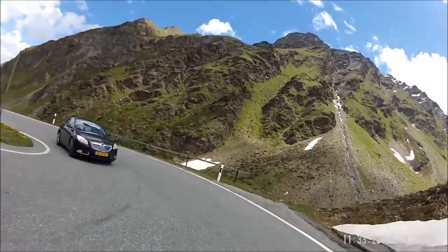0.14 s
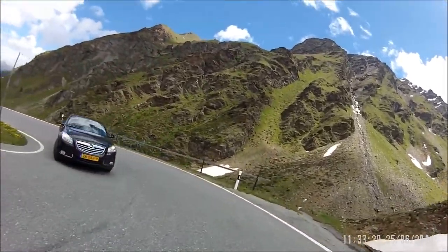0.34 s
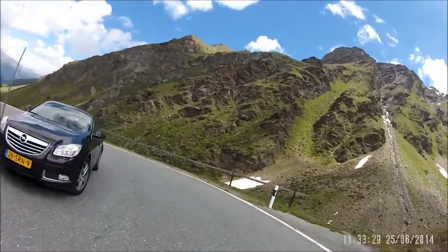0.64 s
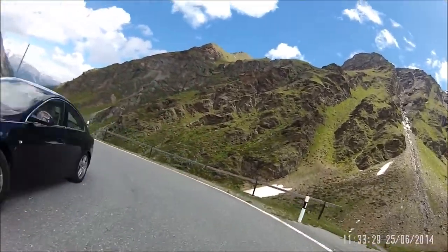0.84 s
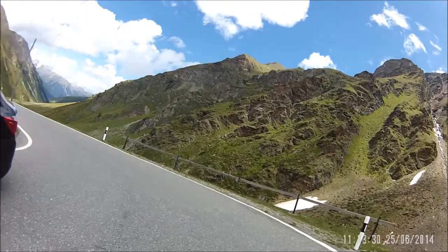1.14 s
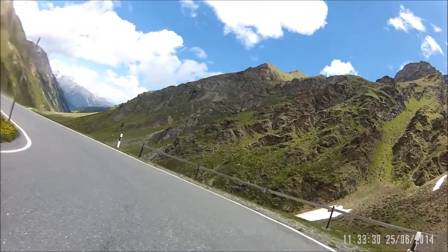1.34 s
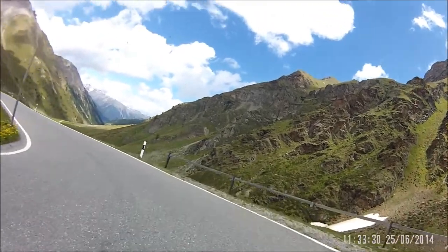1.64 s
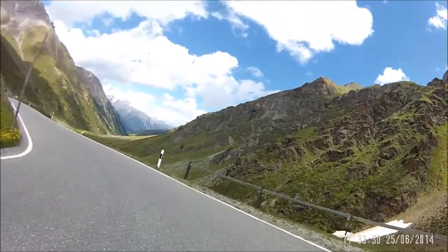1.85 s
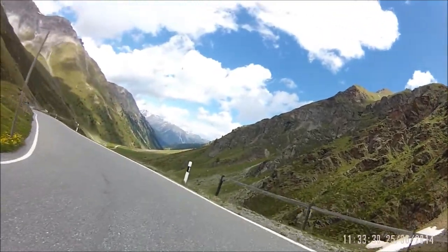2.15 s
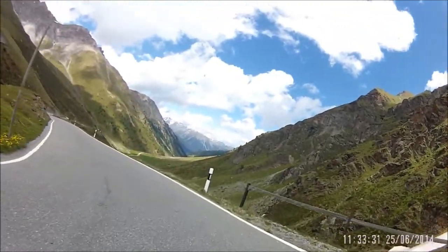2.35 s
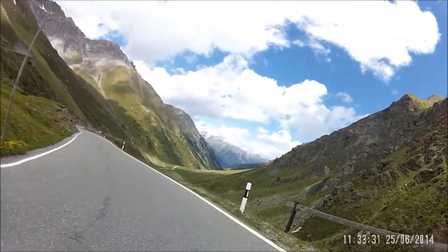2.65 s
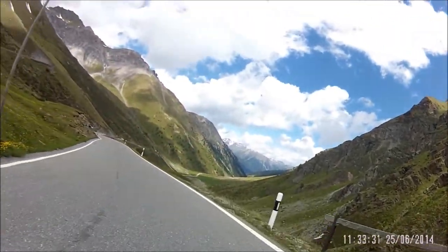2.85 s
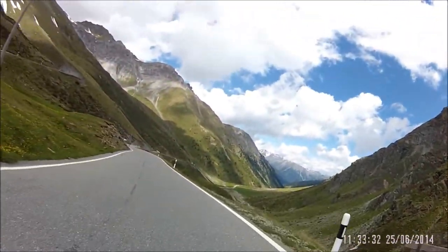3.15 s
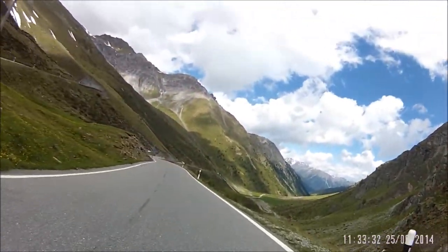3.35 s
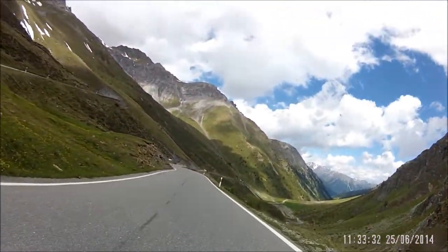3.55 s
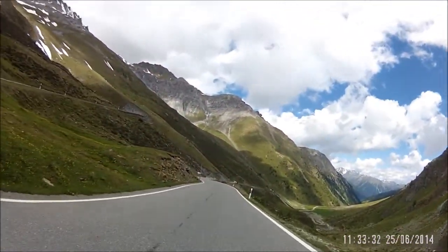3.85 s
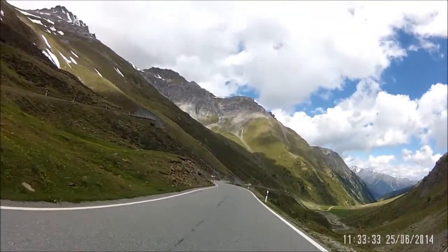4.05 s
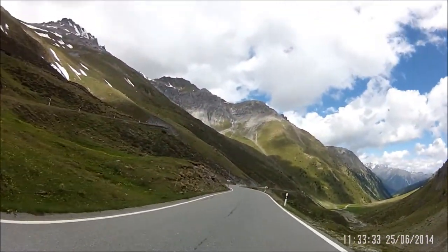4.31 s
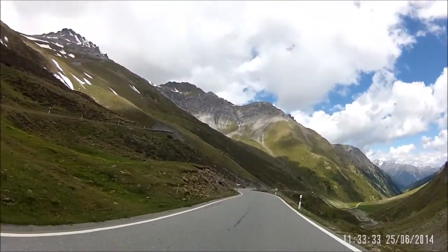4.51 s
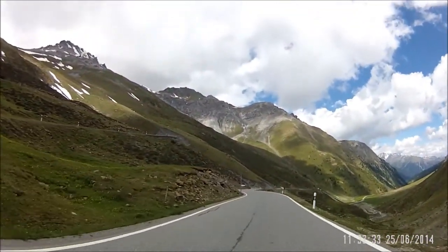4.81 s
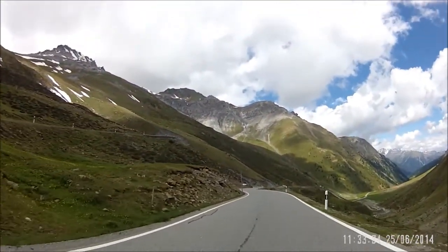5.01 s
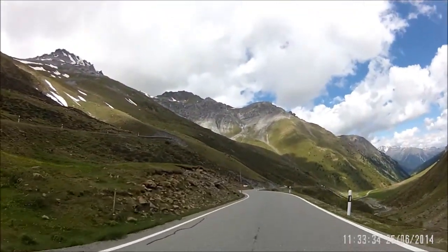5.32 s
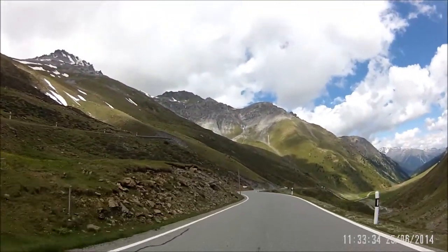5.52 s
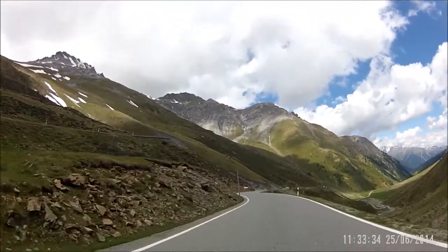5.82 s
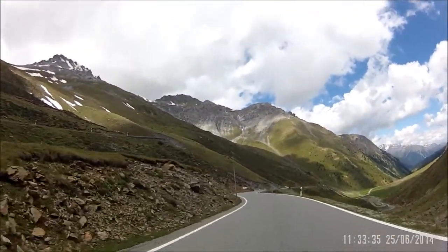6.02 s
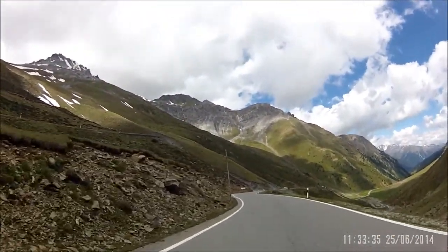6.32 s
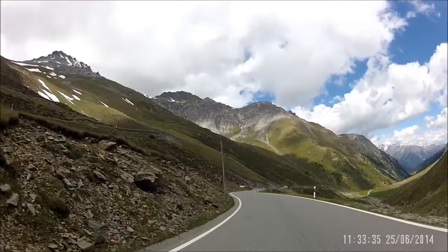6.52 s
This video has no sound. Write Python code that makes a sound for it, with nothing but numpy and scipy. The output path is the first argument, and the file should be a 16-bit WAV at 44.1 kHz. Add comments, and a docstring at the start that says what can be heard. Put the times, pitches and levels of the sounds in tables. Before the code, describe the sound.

Close on-board sound of a motorcycle coasting out of a bend, its two cylinders thumping lumpily at low revs. The tyre hiss of a passing car swells and fades early on. Then the bike pulls away, and the thudding turns into a rising, booming drone with mechanical rattle and whining gears. Wind buffets the microphone a little more as speed builds, the mount ticks faintly, and a road bump thuds near the end.

```python
"""A V-twin motorcycle rolls out of a mountain hairpin near idle and pulls away, heard from on board.
Close to the camera's microphone the exhaust thuds unevenly, the engine cases clatter and knock, and the
gears whine. A car's tyres hiss by in the other lane. About 3.5 s in the throttle opens: the airbox booms
over a low drone and the cam chain whips. Wind rumbles on the camera housing throughout, bumps shake the
fairing, and the mount ticks."""
import sys
import numpy as np
from scipy import signal
from scipy.fft import rfft, irfft, next_fast_len
from scipy.io import wavfile
from scipy.ndimage import map_coordinates

SR = 44100
rng = np.random.default_rng(int(sys.argv[2]) if len(sys.argv) > 2 else 0)


def dump_mix(stems):
    """Bounce the given channels to the path in sys.argv[1] as a 16-bit WAV at rate SR."""
    frames = np.atleast_2d(stems).T  # one column per channel
    limited = np.clip(frames, -1, 1)  # hard clip at full scale
    pcm = np.round(limited * 32767).astype(np.int16)
    wavfile.write(sys.argv[1], SR, pcm)


N = 294130

# engine speed in four-stroke cycles: time_s, rate_hz
CYCLE_RATE = [(0.0, 11.99), (0.748, 12.411), (1.46, 11.478), (1.813, 11.882), (2.418, 11.182),
              (3.005, 11.548), (3.4, 11.6), (3.663, 16.596), (4.176, 16.903), (4.363, 18.679),
              (4.613, 18.318), (5.438, 23.102), (5.826, 25.682), (6.041, 26.406), (6.25, 27.899),
              (6.67, 29.9)]
# throttle: time_s, opening_share
THROTTLE = [(0, 0), (3.38, 0.09), (3.6, 0.47), (3.7, 0.71), (4.17, 0.77), (4.37, 0.9), (6.67, 1)]
# exhaust at the microphone: time_s, level_db
EXHAUST_LEVEL = [(0, -32.8), (1, -35.2), (2.9, -35.2), (3.55, -32.5), (3.75, -45), (4.4, -45), (5.2, -42.5),
                 (6, -40.5), (6.67, -34)]
# exhaust pipe spectra, off and on load: frequency_hz, gain_db
PIPE_IDLE = [(15, -32.5), (36, 1), (60, -15.5), (78, -3), (97, -3.5), (117, -4.5), (148, 7.5), (175, 0.5),
             (217, -9.5), (270, -15.5), (350, -20.5), (510, -47), (900, -45.5), (2000, -77)]
PIPE_LOAD = [(100, -26), (220, -4), (290, 1), (520, -2), (700, -10), (1120, -9.5), (3000, -19)]
# standing waves in the pipe: pitch_hz, width_hz, gain_db
PIPE_MODES = [(94, 45, 12.5), (198.7, 43, 5)]
# clatter spectra of the engine cases, off and on load: frequency_hz, gain_db
CASES_IDLE = [(150, -30), (320, -1.5), (520, -4), (800, -5), (1150, -12), (1500, -4.5), (1750, -4),
              (2400, -1.5), (3000, -7), (3600, -17), (5000, -26), (9000, -38)]
CASES_LOAD = [(150, -36.5), (320, -3.5), (520, -4), (750, -3.5), (1200, -2), (1550, -1.5), (1850, -3.5),
              (2500, -2), (3080, -7), (3300, -9), (5000, -18), (9000, -21.5)]
# ringing of the cases, and one notch: pitch_hz, width_hz, gain_db
CASE_MODES = [(507, 53, 4.5), (890, 21, 2), (1106, 21, 6), (1660, 54, 3), (1895, 25, 4.5), (2150, 43, 3),
              (2400, 79, 1), (3410, 30, -5.5)]
# combustion knock: time_s, level_db
KNOCK_LEVEL = [(0, -56), (3.5, -55), (3.75, -47), (4.15, -45), (4.3, -39.3), (4.62, -37.5), (4.9, -40),
               (5.3, -37.5), (5.8, -41.5), (6.67, -41)]
# what a knock rings: frequency_hz, gain_db
KNOCK_COLOUR = [(300, -28), (1200, -13), (1380, -3), (1450, 4), (1540, -2), (1660, -1), (1850, -6),
                (2300, -4), (2900, -12), (3090, 0), (3250, -17), (9000, -36)]
# gear whine: time_s, gain_db
WHINE_GAIN = [(0, -46), (3.2, -47.5), (4, -47.5), (5.2, -42), (6.67, -43)]
# how well the cases radiate the whine: frequency_hz, gain_db
GEAR_RADIATION = [(700, -13), (1280, -9), (1420, 0), (1580, 0), (1900, -9), (2400, -3), (2750, -10),
                  (3020, -15), (3300, -17), (5000, -30)]
# gear teeth slapping as the crank surges: angle_cycles, width_cycles, strength
TOOTH_SLAPS = [(.06, .03, .5), (.34, .07, .45), (.53, .05, .8), (.79, .03, 1.1), (.91, .04, 1.15)]
# wind buffet and wheel thud spectrum: frequency_hz, gain_db
BUFFET = [(12, -11), (24, -6), (38, -5.5), (65, -8), (120, -6.5), (250, -15), (600, -38), (4000, -80)]
# tyre hiss from the other lane: frequency_hz, gain_db
TYRES = [(200, -20), (900, -4), (1200, -6), (2500, 0), (3400, -3.5), (3800, -11), (5000, -15), (10000, -28)]
# bumps in the road: time_s, rattle_db, thud_db
BUMPS = [(3.325, -41, -42), (4.0, -39, -50), (4.09, -35, -45), (5.3, -37, -38), (5.78, -37, -39),
         (6.32, -34, -23)]
# fairing rattle: frequency_hz, gain_db
FAIRING = [(200, -22), (360, 2.5), (450, -13.5), (570, 3), (680, -19.5), (1500, -29)]
# low drone: time_s, level_db
DRONE_LEVEL = [(3.56, -56), (3.85, -41), (4.15, -45), (4.37, -30), (4.68, -32), (4.85, -26), (5.08, -31),
               (5.4, -25.8), (5.87, -24.5), (6.05, -38), (6.25, -27.5), (6.67, -22.5)]
# airbox boom: time_s, gain_db
BOOM_GAIN = [(3.6, -52), (3.68, -35), (3.85, -31.5), (4.15, -30), (4.38, -26.5), (4.68, -28.3),
             (5.8, -26.7), (6.1, -24), (6.28, -19.7), (6.67, -19.8)]
# harmonics of the uneven intake gulps: multiple_of_cycle_rate, gain_db
GULP_ORDERS = [(2, -15), (3, -14), (5, -2.5), (6, -3), (7, 1), (8, 3.5), (9, 4), (10, 1), (11, 0), (12, -2),
               (13, -2)]
# intake duct resonances, and the one broad peak at high revs: frequency_hz, gain_db
DUCT = [(75, 0), (104, 0), (119, -17), (134, -3.5), (148, .5), (168, -5), (200, -8), (300, -25)]
DUCT_WIDE = [(115, -8), (145, 0), (175, -4), (205, -15), (330, -28)]
# case resonances that the cam chain drives: pitch_hz, width_hz, gain_db
CHAIN_MODES = [(368, 70, -1), (485, 63, -0.5), (697, 46, -8.5), (933, 58, -2.5), (1101, 28, -2)]
# ticks of the camera mount: start_s, gain_db
MOUNT_TICKS = [(3.712, -42), (5.1952, -36), (5.9449, -45)]
# spectrum of a tick: frequency_hz, gain_db
TICK_COLOUR = [(1000, -14), (2200, 3), (5300, 10), (7000, 20), (12000, 2)]
# treble roll-off of the microphone: frequency_hz, gain_db
MICROPHONE = [(5100, 0), (5700, -9), (6500, -26), (8000, -40), (12000, -52)]

V_LAG = 270 / 720  # the second cylinder fires this share of a cycle after the first
IDLE_RATE_HZ = 12


def amp(db):
    """Decibels to gain."""
    return 10 ** (np.asarray(db) / 20)


def unit(x):
    """Scale to rms 1."""
    return x / np.sqrt(np.mean(x ** 2) + 1e-20)


def curve(points):
    """One value per sample from (time_s, value) points."""
    return np.interp(np.arange(N) / SR, *np.transpose(points))


def db_at(points, hz):
    """Read (frequency_hz, gain_db) points on a log axis."""
    f, db = np.transpose(points)
    return np.interp(np.log(hz), np.log(f), db)


def wobble(rate):
    """A smooth random curve, rate knots a second."""
    knots = rng.standard_normal(int(N * rate / SR) + 4)
    return map_coordinates(knots, [np.arange(N) * rate / SR])


def resonance(hz, centre, width):
    """A resonant peak of height 1."""
    return 1 / (1 + (2 * (hz - centre) / width) ** 2)


def colour(x, spectrum, modes=()):
    """Causal filter with a broad spectrum and resonant peaks on top."""
    m = 2 * next_fast_len(N // 2 + SR // 4)
    hz = np.fft.rfftfreq(m, 1 / SR)
    db = db_at(spectrum, hz + 1)
    db += sum(peak * resonance(hz, centre, width) for centre, width, peak in modes)
    cepstrum = irfft(np.log(amp(db)), m)
    cepstrum[1:m // 2] *= 2  # fold to minimum phase
    cepstrum[m // 2 + 1:] = 0
    return irfft(rfft(x, m) * np.exp(rfft(cepstrum)), m)[:N]


def noise(spectrum):
    """Coloured noise of rms 1."""
    return unit(colour(rng.standard_normal(N), spectrum))


def blend(idle, load, share):
    """Equal-power change from the off-load to the on-load sound."""
    return np.sqrt(1 - share) * unit(idle) + np.sqrt(share) * unit(load)


def strokes(cycles, angle, scatter_db, jitter_s):
    """One impulse a cycle at this angle (a share of the cycle), uneven in size and time."""
    marks = np.arange(angle, cycles[-1], 1)
    timing, size = rng.standard_normal((len(marks), 2)).T
    at = np.interp(marks, cycles, np.arange(N)) + jitter_s * SR * timing
    return np.bincount(np.clip(at, 0, N - 1).astype(int), amp(scatter_db * size), N)


def gate(cycles, angle, length):
    """Opens once a cycle at this angle and dies away over a share of the cycle."""
    return np.exp(-((cycles - angle) % 1) / length)


def exhaust(cycles, rate, throttle):
    """Each cylinder blows down into the ringing pipe; off load the gas burbles between thuds."""
    opens = .69  # exhaust valve angle

    def thuds(second_gain, scatter_db, jitter_s):
        first = strokes(cycles, opens, scatter_db, jitter_s)
        second = strokes(cycles, opens + V_LAG, scatter_db, jitter_s)
        return unit((first + second_gain * second) / np.sqrt(rate))

    gas_flow = gate(cycles, opens, length=.33) + gate(cycles, opens + V_LAG, length=.29)
    burble = amp(-11.5) * unit(rng.standard_normal(N) * gas_flow)
    idle = colour(thuds(.9, scatter_db=2, jitter_s=.0005) + burble, PIPE_IDLE, PIPE_MODES)
    # under load the burn is even, so the same rasp repeats every cycle
    rasp = map_coordinates(rng.standard_normal(512), [cycles % 1 * 512], mode="grid-wrap")
    load = colour(.6 * thuds(1.5, scatter_db=1, jitter_s=.00005) + rasp, PIPE_LOAD)
    return amp(curve(EXHAUST_LEVEL)) * blend(idle, load, throttle ** 3)


def duct_ring(cycles, throttle):
    """Behind the shut throttle each closing valve leaves the intake duct ringing."""
    pitch_hz, t60_s, attack_s = 152, .16, .003
    t = np.arange(SR // 4) / SR
    envelope = amp(-60 * t / t60_s) * (1 - np.exp(-t / attack_s))
    ring = envelope * np.sin(2 * np.pi * pitch_hz * t)
    kicks = strokes(cycles, .06, scatter_db=2.5, jitter_s=.0005)
    kicks += .5 * strokes(cycles, .06 - V_LAG + 1, scatter_db=3, jitter_s=.001)
    return amp(-38.5) * (1 - throttle) ** 2 * unit(signal.fftconvolve(kicks, ring)[:N])


def contacts(cycles, count):
    """Many small impacts recur at the same points of every cycle: a gritty, pitched rasp."""
    out = np.zeros(N)
    for k, (push, shift) in enumerate(rng.standard_normal((count, 2))):
        angle = (k + .3 * shift) / count % 1
        out += np.sign(push) * strokes(cycles, angle, scatter_db=2.5, jitter_s=.00006)
    return out


def clatter(cycles, rate, throttle):
    """Valve gear and chains rattle the cases, louder and grittier with speed and load."""
    idle_db, per_doubling_db, load_db = -44, 3.5, 8.5
    surges = gate(cycles, .47, length=.06) + gate(cycles, .88, length=.25)
    valves = gate(4 * cycles, .1, length=.2)
    drive = (1 + .45 * surges + .25 * valves) * amp(1.2 * wobble(140))
    rattle = drive * rng.standard_normal(N)
    grit = drive * unit(contacts(cycles, count=56))
    idle = colour(rattle, CASES_IDLE, CASE_MODES)
    load = colour(rattle + .7 * grit, CASES_LOAD, CASE_MODES)
    level_db = idle_db + per_doubling_db * np.log2(rate / IDLE_RATE_HZ) + load_db * throttle ** 3.55
    return amp(level_db) * blend(idle, load, throttle)


def knock(cycles):
    """Each combustion raps the cases: the first cylinder sharply, the second with a longer chatter."""
    t = np.arange(SR // 30) / SR

    def rap(angle, decay_s):
        firings = strokes(cycles, angle, scatter_db=1.3, jitter_s=.0004)
        return signal.fftconvolve(firings, np.exp(-t / decay_s) - np.exp(-t / .0013))[:N]

    force = rap(.485, decay_s=.004) + .6 * rap(.485 + V_LAG, decay_s=.008)
    return amp(curve(KNOCK_LEVEL)) * unit(colour(force * rng.standard_normal(N), KNOCK_COLOUR))


def gear_whine(cycles, rate):
    """The primary gears sing in chattering pulses, wavering as the crank surges in each cycle."""
    teeth_per_cycle, lope_below_hz = 65.6, 12.2
    surge = .025 * np.cos(2 * np.pi * (cycles - .1)) + .016 * np.cos(4 * np.pi * (cycles - .2))
    surge += .008 * wobble(220)
    # at low revs the crank also lopes over two cycles
    lope = .024 * np.clip(2 * (lope_below_hz - rate), 0, 1) * np.cos(np.pi * (cycles - .35))
    mesh_phase = 2 * np.pi * teeth_per_cycle * np.cumsum(rate + IDLE_RATE_HZ * (surge + lope)) / SR
    tones = np.zeros(N)
    for k in range(1, 5):
        gain_db = db_at(GEAR_RADIATION, k * teeth_per_cycle * rate) + 2.5 * wobble(70)
        tones += amp(gain_db) * np.sin(k * mesh_phase + .5 * wobble(230))
    chatter = np.full(N, .3)
    for angle, width, strength in TOOTH_SLAPS:
        from_slap = (cycles - angle + .5) % 1 - .5
        chatter += strength * np.exp(-.5 * (from_slap / width) ** 2)
    return amp(curve(WHINE_GAIN)) * np.sqrt(2) * unit(chatter) * tones


def wind(rate):
    """Lumpy low buffeting right on the camera housing, growing with speed."""
    idle_db, per_doubling_db = -37.5, 5.8
    lumps_db = 2 * wobble(12)
    return amp(idle_db + per_doubling_db * np.log2(rate / IDLE_RATE_HZ) + lumps_db) * noise(BUFFET)


def passing_car():
    """Tyre hiss from one lane away swells and fades with the car's distance."""
    closest_s, half_power_s = .9, .57
    t = np.arange(N) / SR
    relative_distance = np.sqrt(1 + ((t - closest_s) / half_power_s) ** 2)
    return amp(-44) * noise(TYRES) / relative_distance


def bumps():
    """The front wheel thuds over rough patches and shakes the fairing."""
    t = np.arange(N) / SR
    jolt = lambda time_s, width_s: np.exp(-((t - time_s) / width_s) ** 2)
    rattle = sum(amp(db) * jolt(time_s, width_s=.023) for time_s, db, _ in BUMPS)
    thud = sum(amp(db) * jolt(time_s, width_s=.027) for time_s, _, db in BUMPS)
    return rattle * noise(FAIRING) + thud * noise(BUFFET)


def drone(cycles):
    """A firm low tone at twice the crank speed, four waves to a cycle."""
    return amp(curve(DRONE_LEVEL)) * np.sqrt(2) * np.cos(8 * np.pi * (cycles - .21))


def airbox(cycles, rate, throttle):
    """Two intake gulps merge into one throb a cycle, whose orders swell crossing the duct resonances."""
    middle_order, delay_per_order, longest_delay = 8.7, .19, .2  # delays in cycles
    wide = np.interp(rate, [26.7, 28], [0, 1])  # at high revs one broad resonance takes over
    boom = np.zeros(N)
    for order, gulp_db in GULP_ORDERS:
        hz = order * rate
        gain_db = gulp_db + (1 - wide) * db_at(DUCT, hz) + wide * db_at(DUCT_WIDE, hz)
        gain_db += .5 * wobble(18)
        # the duct smears each throb into an upward sweep: low orders early, high ones late
        delays = np.minimum(delay_per_order * (np.arange(order) + .5 - middle_order), longest_delay)
        phase = 2 * np.pi * (order * cycles - delays.sum()) + .05 * wobble(25)
        boom += amp(gain_db) * np.sqrt(2) * np.cos(phase)
    # a half-shut throttle chokes the ringing between throbs
    throb = 1 + .5 * (1 - throttle) * np.cos(2 * np.pi * (cycles - .03))
    return amp(curve(BOOM_GAIN)) * throb * boom


def cam_chain(cycles, rate, throttle):
    """The chain whips under load; its rough overtones swell in turn crossing the case resonances."""
    overtones = np.zeros(N)
    for order in range(14, 60):
        gain = sum(amp(db) * resonance(order * rate, hz, width) for hz, width, db in CHAIN_MODES)
        flicker = amp(3.5 * wobble(14))
        phase = 2 * np.pi * (order * cycles + rng.random()) + .6 * wobble(45)
        overtones += gain * flicker * np.sin(phase)
    return amp(-39.5) * throttle ** 4 * rate / rate.max() * unit(overtones)


def mount_ticks():
    """Tiny dry plastic contacts in the mount, right by the microphone."""
    t60_s = .012
    out, t = np.zeros(N), np.arange(SR // 50) / SR
    for start_s, gain_db in MOUNT_TICKS:
        envelope = amp(gain_db + 7 - 60 * t / t60_s)
        out[round(start_s * SR):][:len(t)] += envelope * rng.standard_normal(len(t))
    return colour(out, TICK_COLOUR)


def scene():
    """The ride in mono from the camera's place; one crankshaft times all the engine's sounds."""
    rate, throttle = curve(CYCLE_RATE), curve(THROTTLE)
    cycles = np.cumsum(rate) / SR  # two crank turns each
    gas = exhaust(cycles, rate, throttle) + airbox(cycles, rate, throttle) + duct_ring(cycles, throttle)
    metal = clatter(cycles, rate, throttle) + knock(cycles)
    metal += gear_whine(cycles, rate) + cam_chain(cycles, rate, throttle)
    road = passing_car() + wind(rate) + bumps() + mount_ticks()
    return (gas + drone(cycles) + metal + road)[None]


def record(dry):
    """The camera's microphone dulls the treble; faint hiss and a thin whistle join, all band-limited."""
    whistle_hz, band_limit_hz = 10520, 15200
    hiss = amp(-76) * noise([(100, 0), (7000, 0), (15000, -4)])
    whistle = amp(-87) * np.sqrt(2) * np.sin(2 * np.pi * whistle_hz * np.arange(N) / SR)
    picked_up = colour(dry[0], MICROPHONE) + hiss + whistle
    m = next_fast_len(N + SR // 2)
    in_band = np.fft.rfftfreq(m, 1 / SR) < band_limit_hz
    return irfft(rfft(picked_up, m) * in_band, m)[None, :N]


dry = scene()
out = record(dry)
dump_mix(out)
```